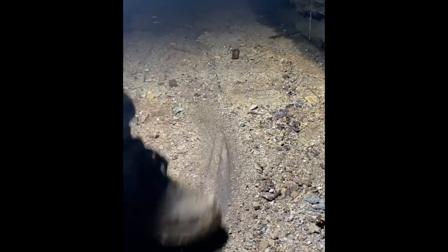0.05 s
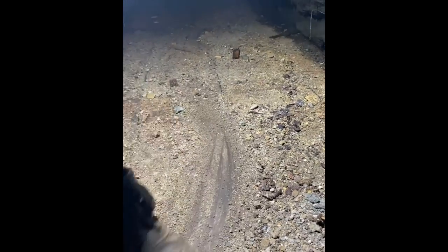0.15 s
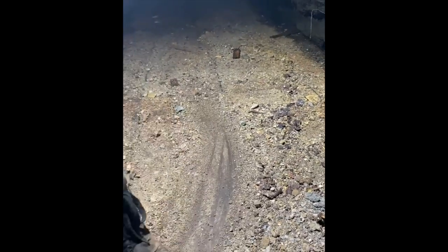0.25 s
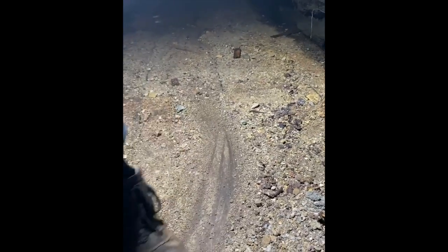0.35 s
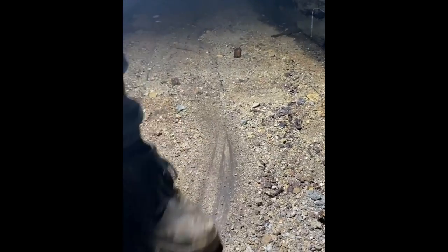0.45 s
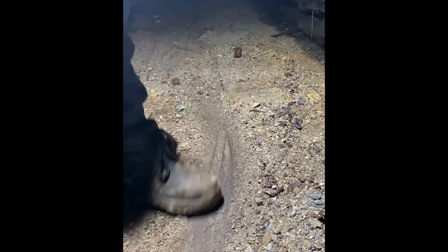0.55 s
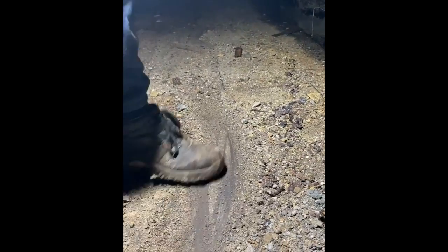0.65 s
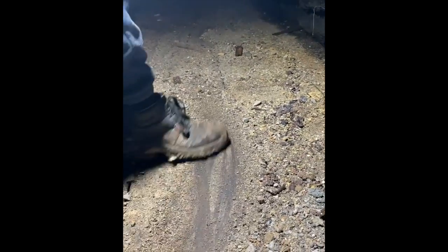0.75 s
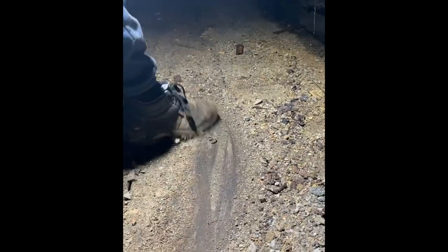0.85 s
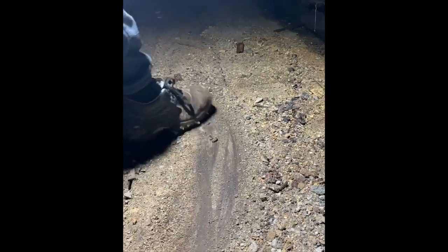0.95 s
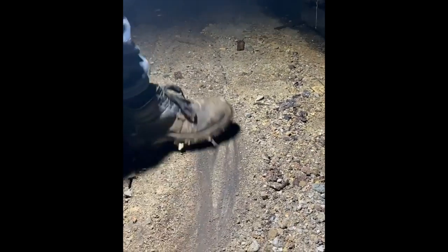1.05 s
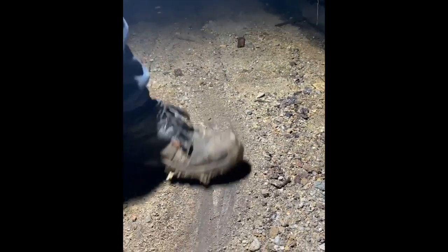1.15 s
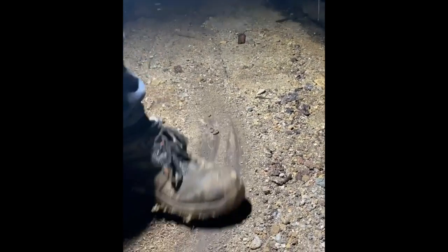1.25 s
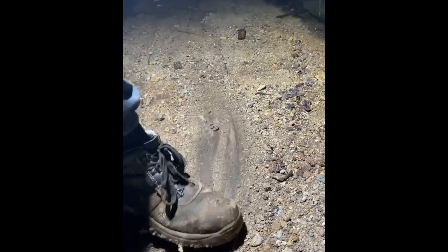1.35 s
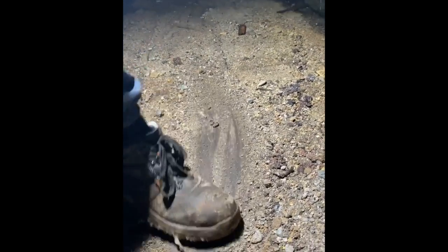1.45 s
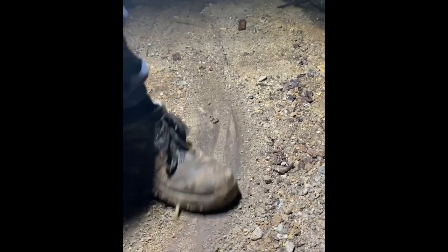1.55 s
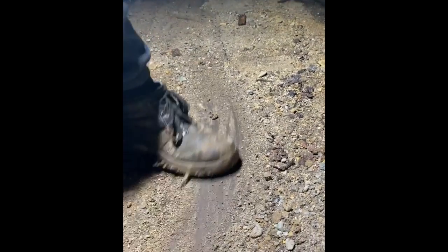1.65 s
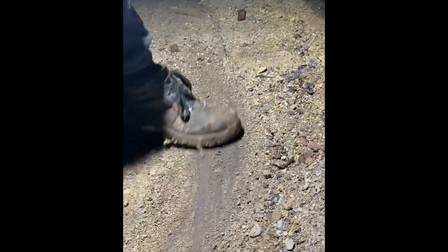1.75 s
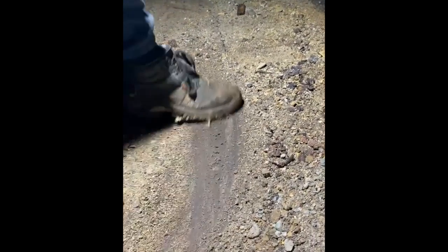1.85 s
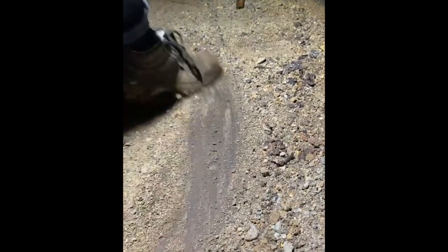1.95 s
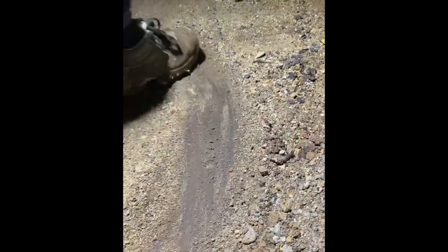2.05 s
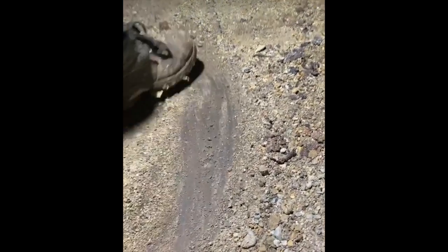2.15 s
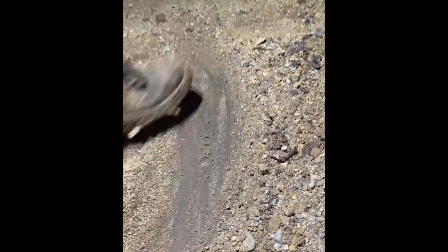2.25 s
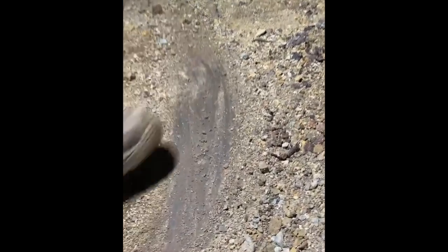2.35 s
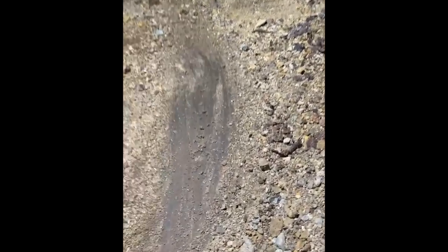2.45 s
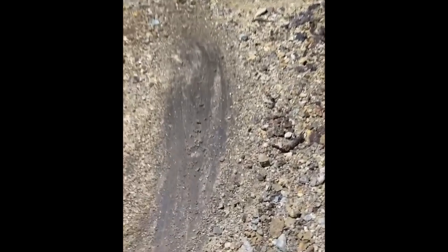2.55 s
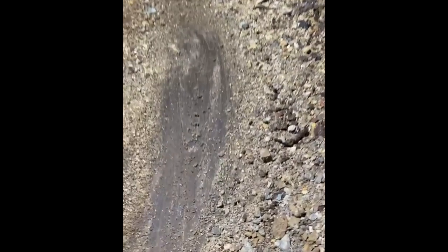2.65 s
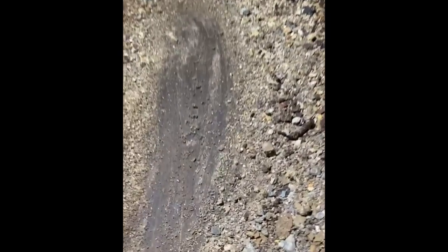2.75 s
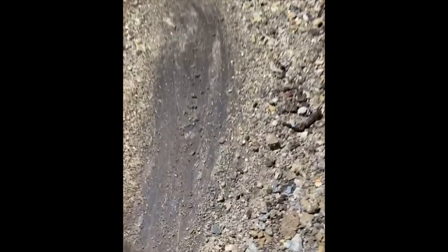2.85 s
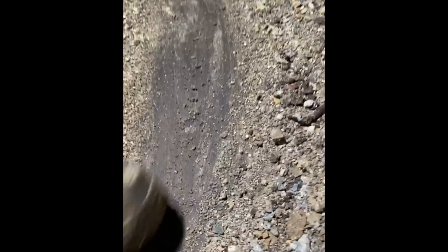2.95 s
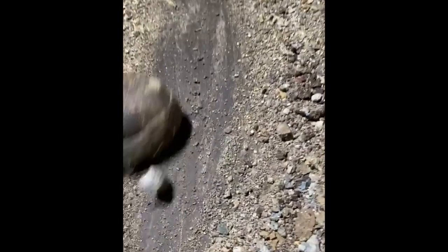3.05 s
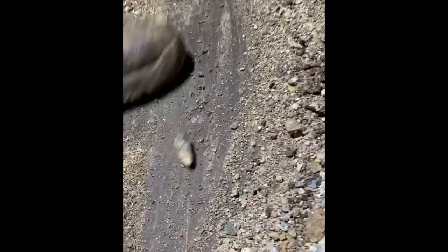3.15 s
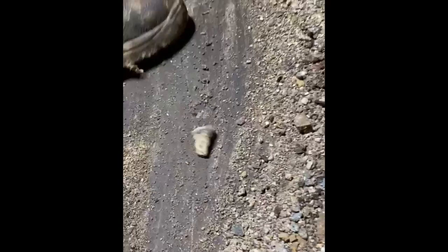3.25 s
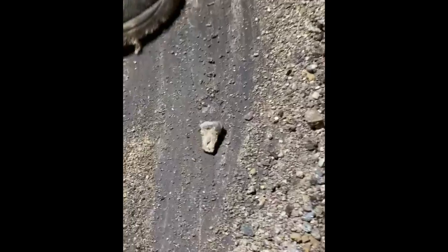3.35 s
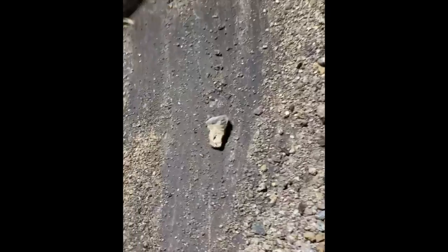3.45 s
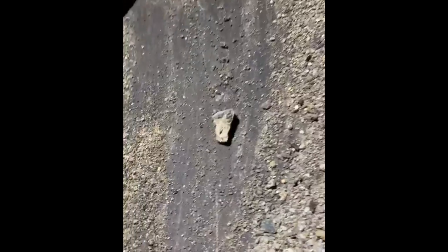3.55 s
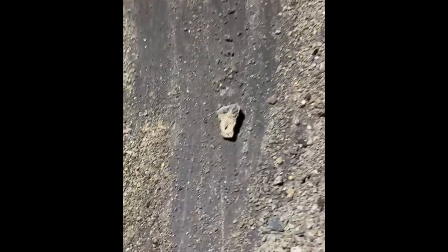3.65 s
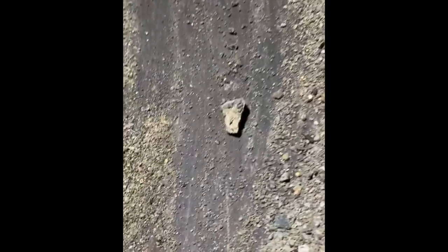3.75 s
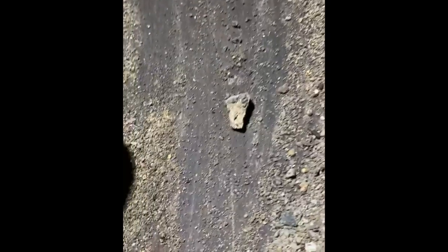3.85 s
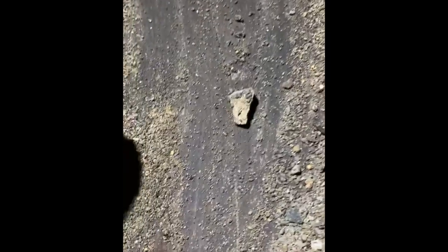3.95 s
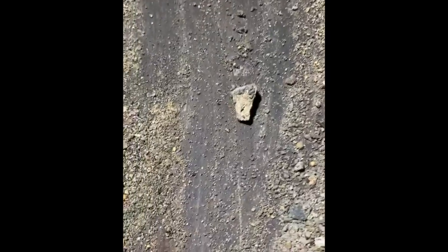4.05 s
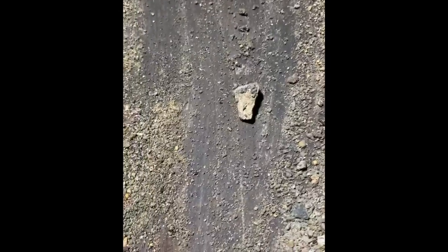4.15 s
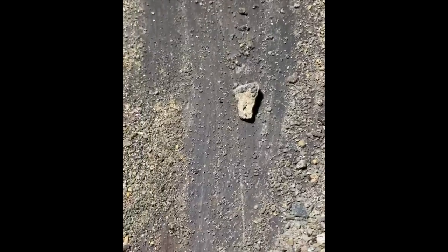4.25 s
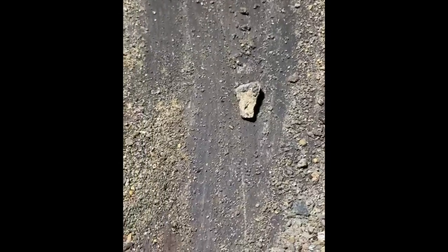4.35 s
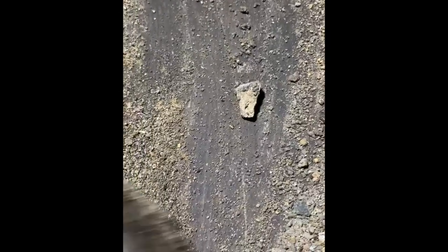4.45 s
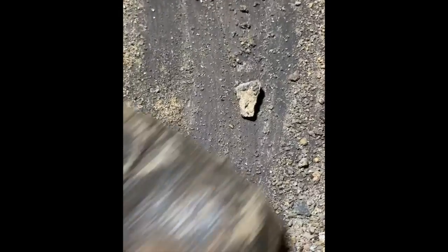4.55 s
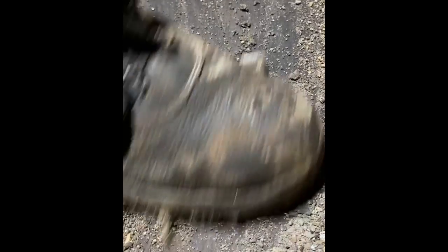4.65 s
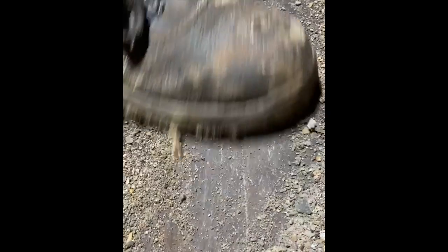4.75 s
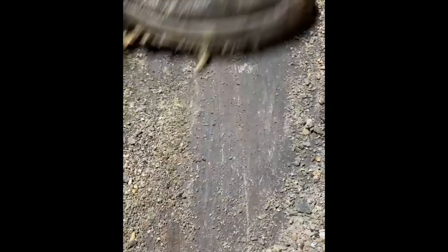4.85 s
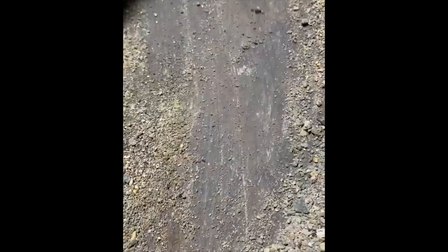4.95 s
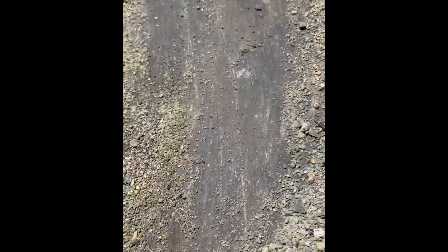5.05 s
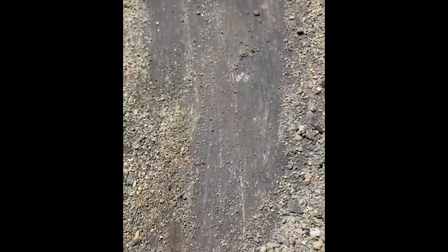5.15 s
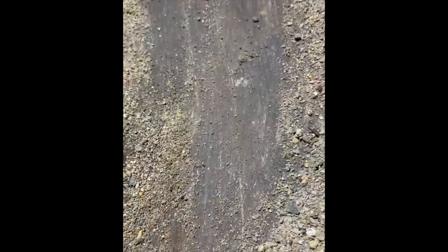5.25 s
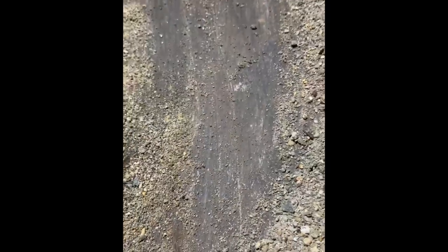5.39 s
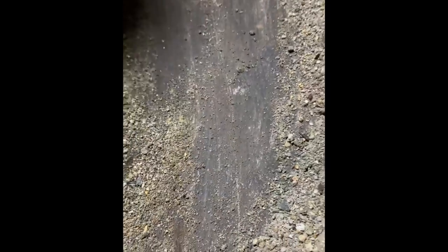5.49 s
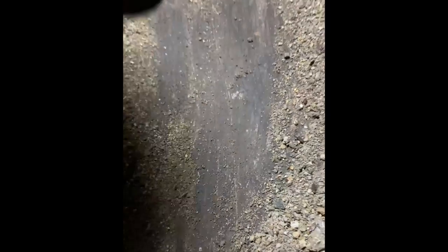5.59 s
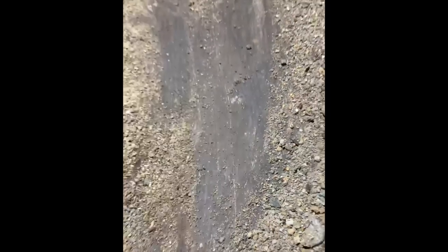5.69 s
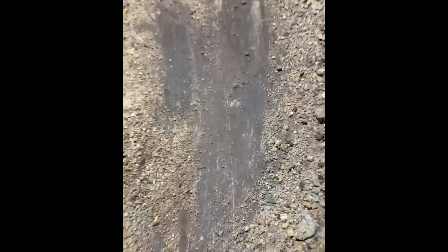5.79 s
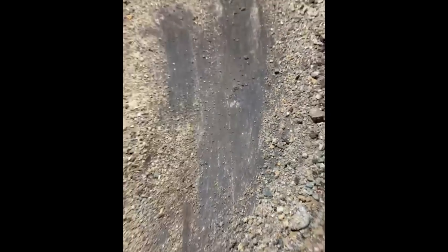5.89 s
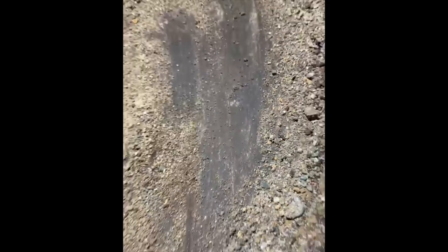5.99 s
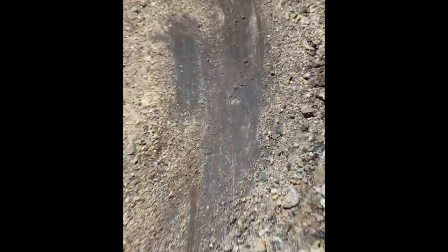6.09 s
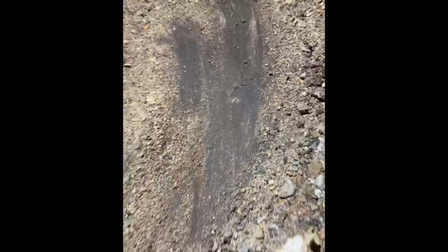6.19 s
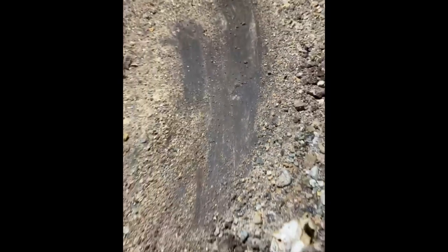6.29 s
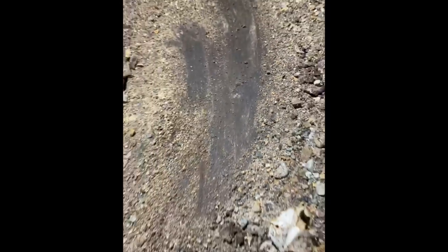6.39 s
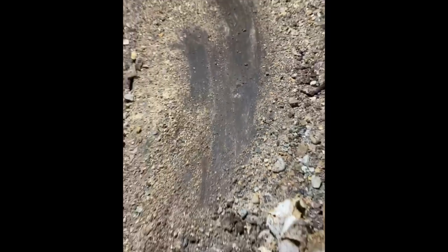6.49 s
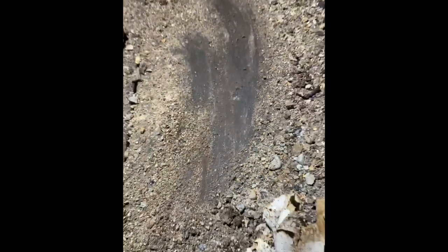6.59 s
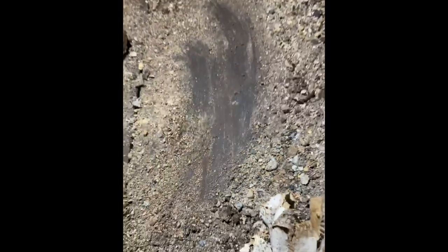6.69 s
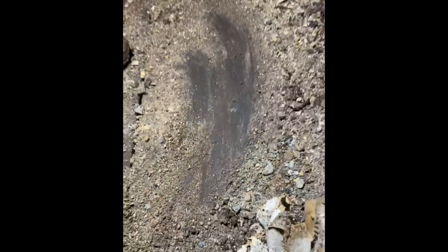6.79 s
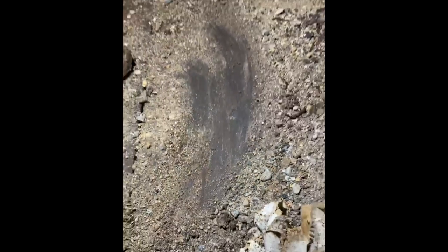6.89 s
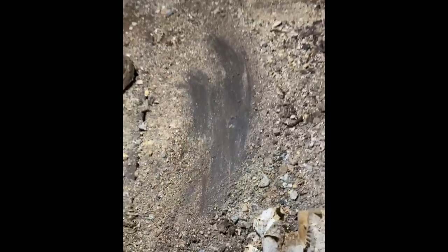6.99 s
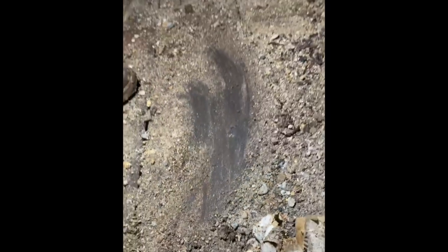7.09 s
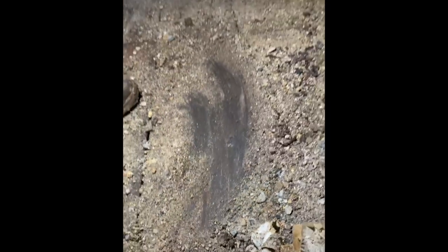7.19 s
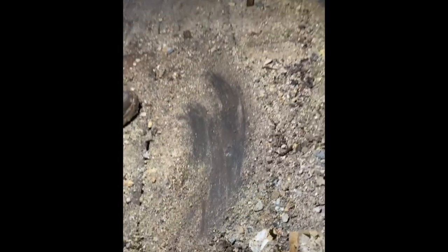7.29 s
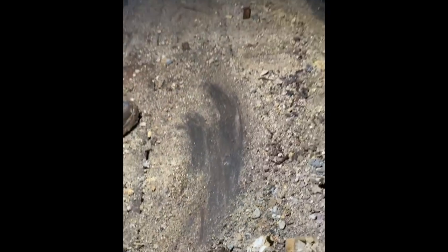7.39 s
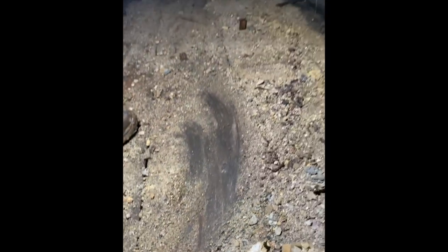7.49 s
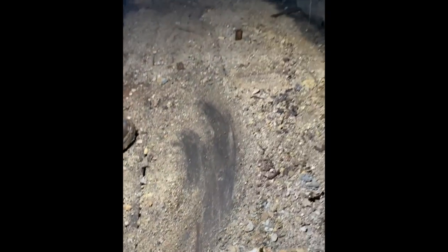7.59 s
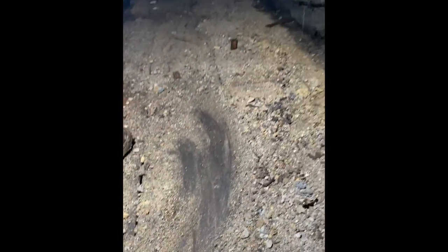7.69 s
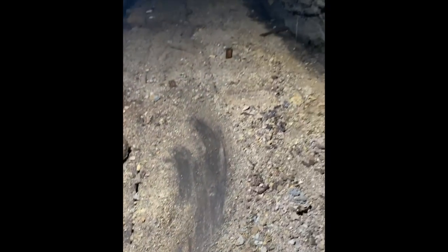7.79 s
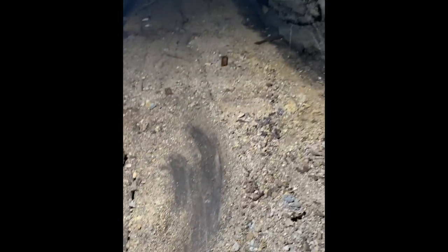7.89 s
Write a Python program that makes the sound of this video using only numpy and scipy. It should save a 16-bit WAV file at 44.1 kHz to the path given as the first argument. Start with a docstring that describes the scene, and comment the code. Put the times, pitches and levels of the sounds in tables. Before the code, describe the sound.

A heavy boot works over gritty packed ground in a still cellar, heard close in stereo with a slight short echo. A loud stone knock sounds at 0.1 s, then a gravelly scrape runs from 0.35 s, strongest around 0.8 s. A second drag from 1.4 s grinds coarser, with deep soft thuds near 1.8 s, and a crunch with a bright tick follows at 2.15 s. From 2.6 s pebbles tick and knock, building to the loudest hard crunch, snap and thump at about 2.97 s; scraping continues until 3.5 s. A lull holds only small stone clicks around 4.2 s. At 4.5 s the sole faintly ratchets, then knocks, judders and drags to about 5.3 s. A short scuff and knock come at 5.8 s. From 6.1 s to nearly 8 s, only faint grit shifts and tiny knocks remain over quiet low air.

```python
"""A work boot drags across a gritty cellar floor: clumped grain noise, its layers following pressure,
slide and weight. Stones knock and tick, and the other foot shifts its weight; knocks glide down,
as the ground carries treble faster than bass. Packed ground thuds as decaying sines; the loaded sole
slips and judders, ringing its modes. Cellar echo and still air surround it, at two microphone ports."""
import sys
import numpy as np
from scipy import signal
from scipy.fft import rfft, irfft, next_fast_len
from scipy.io import wavfile
from scipy.ndimage import uniform_filter1d

SR = 44100
rng = np.random.default_rng(int(sys.argv[2]) if len(sys.argv) > 2 else 0)


def digitize_waveform(pressure):
    """Quantize a signal to 16-bit integers and store it at the path in sys.argv[1].

    Rows of a 2-D input are taken as channels; values are limited to [-1, 1].
    """
    field = np.atleast_2d(pressure).T
    bounded = np.clip(field, -1, 1)
    quanta = np.round(bounded * 32767).astype(np.int16)
    wavfile.write(sys.argv[1], SR, quanta)


N = 349713

# Event levels are set ahead of the ports; spectrum levels are relative.
# still cellar air: freq_hz, level_db
AIR_SPECTRUM = [(18, -30), (30, 5), (76, 13.5), (597, -10), (1780, -19.5), (4780, -49), (6530, -42.5),
                (10400, -38.5), (15000, -71)]
# strokes and weight shifts, one sub-table each: time_s, pressure_db (gravel), slide_db (grit), weight_db (rumble)
STROKES = [
    [(0.0, -55.5, -74, -38), (0.05, -64, -60, -56.5), (0.13, -34, -54, -37.5), (0.19, -49, -68.5, -54.5),
     (0.33, -43, -51.5, -42)],
    [(0.34, -40.5, -53, -34.5), (0.516, -41, -42.5, -40.5), (0.66, -35.5, -42, -33),
     (0.766, -43, -44.5, -36), (0.772, -20.5, -31.5, -30), (0.817, -26.5, -37, -28.5),
     (0.868, -31.5, -46, -24), (0.9, -45.5, -56, -40), (1.137, -66.5, -86, -52)],
    [(1.375, -66, -75.5, -57.5), (1.47, -52, -47, -47), (1.6, -38.5, -38.5, -42),
     (1.69, -30.5, -38.5, -27.5), (1.744, -39.5, -38.5, -31), (1.824, -24.5, -37, -14.5),
     (1.88, -33, -39, -26), (1.945, -41.5, -52, -31), (1.98, -50.5, -59, -40.5), (2.1, -60.5, -73, -44.5)],
    [(2.15, -46, -57, -36), (2.19, -52, -59, -38), (2.27, -61, -67.5, -51.5), (2.48, -71, -76.5, -54.5),
     (2.58, -80, -65.5, -63.5)],
    [(2.624, -38, -52.5, -36.5), (2.65, -40.5, -58, -25.5), (2.73, -46.5, -55.5, -40), (2.8, -38, -48, -27),
     (2.87, -29.5, -63, -26.5), (2.945, -36.5, -60.5, -27.5)],
    [(2.99, -32, -42.5, -19.5), (3.041, -37, -43, -23), (3.11, -36, -32, -37), (3.16, -34.5, -40, -26.5),
     (3.23, -45, -41.5, -42.5), (3.43, -39, -43.5, -33.5), (3.49, -50, -57, -45), (3.8, -68.5, -67, -70)],
    [(4.12, -57, -72, -65), (4.15, -48, -64, -46.5), (4.284, -46.5, -62.5, -43), (4.34, -51.5, -65, -45),
     (4.45, -92, -70, -63.5)],
    [(4.49, -75, -60, -87), (4.62, -64, -61.5, -76), (4.635, -41.5, -38, -50.5), (4.69, -41, -36.5, -31.5),
     (4.753, -28, -33.5, -26.5), (4.9, -30.5, -34, -36), (5.123, -31.5, -39.5, -34), (5.2, -40.5, -51, -33),
     (5.43, -64, -73, -63.5)],
    [(5.75, -56.5, -66.5, -58.5), (5.77, -37, -46, -51.5), (5.87, -40.5, -48.5, -46.5),
     (5.92, -49, -58.5, -51.5), (6.0, -60.5, -62, -72)],
    [(6.4, -68, -109, -72.5), (6.68, -62.5, -72.5, -65), (6.86, -51, -70, -56.5), (7.0, -58.5, -71, -50),
     (7.16, -56.5, -69, -59), (7.31, -58, -72, -52.5), (7.42, -69, -75, -71)],
]
# one value per stroke: dust_db re grit
DUST_RE_GRIT_DB = [-7, 0.5, -0.5, -2.5, -6.5, -3.5, 4, 0, -3, -30.5]
# one value per stroke: sand_db re grit
SAND_RE_GRIT_DB = [-6.5, 0, -8, -3.5, 4, -3.5, 4, -9.5, -6, 7]
# loose bits never quite at rest: gravel_db, grit_db, dust_db, rumble_db, sand_db
TRICKLE_DB = (-77, -75.5, -76, -77.5, -80)
# clods crushed under the sole: start_s, gravel_db, grit_db, dust_db, t60_s
CRUNCHES = [(0.344, -41, -37, -42.5, 0.15), (0.63, -36, -49, -31, 0.12), (2.143, -34, -44.5, -38, 0.13),
            (2.959, -9, -21.5, -42.5, 0.082), (2.998, -23, -21, -35, 0.19), (5.858, -36, -31, -45, 0.08),
            (6.061, -53.5, -58.5, -60, 0.45), (6.689, -47.5, -53.5, -60, 0.087),
            (6.984, -42, -80, -89, 0.15)]
# gravel: freq_hz, level_db
GRAVEL_SPECTRUM = [(90, -13.5), (180, 0), (290, 2), (450, -5.5), (750, -5.5), (1200, -12), (1800, -20.5),
                   (3000, -39)]
# grit: freq_hz, level_db
GRIT_SPECTRUM = [(800, -4), (1500, -2.5), (2500, -4), (3500, -4.5), (4600, -5.5), (6000, -37.5)]
# fine dust: freq_hz, level_db
DUST_SPECTRUM = [(3800, -6.5), (5200, -3), (7000, -6.5), (10000, -7.5), (12500, -10.5), (14500, -26),
                 (16500, -26)]
# ground rumble: freq_hz, level_db
GROUND_SPECTRUM = [(20, -47), (45, -25), (62, -2), (72, -0.5), (78, 4.5), (85, -4), (105, -6), (140, -10),
                   (220, -18.5), (400, -53)]
# coarse rolling sand: freq_hz, level_db
SAND_SPECTRUM = [(600, -16), (1100, 5), (1700, 2.5), (2300, 0), (3200, -28)]
# single bright grains snapping: time_s, peak_db, centre_hz
TICKS = [(0.042, -39, 7150), (0.307, -36, 7950), (0.371, -50, 3700), (0.948, -34, 5140),
         (0.9878, -33, 5870), (1.375, -43.5, 5580), (0.822, -16.5, 7000), (1.6747, -20.5, 2780),
         (1.697, -21, 4500), (1.7499, -35, 8330), (2.158, -19, 5500), (2.624, -32, 9200),
         (2.639, -25.5, 9500), (2.656, -39.5, 8900), (2.687, -38.5, 8300), (2.7056, -28.5, 9200),
         (2.835, -33.5, 7160), (2.882, -28, 9600), (2.9016, -27, 9720), (2.9634, -4.5, 8710),
         (2.971, -9.5, 3580), (3.0061, -16.5, 6000), (3.108, -30.5, 7820), (3.744, -46, 2600),
         (4.151, -31.5, 8930), (4.1816, -39.5, 8100), (4.2555, -41.5, 8000), (4.3235, -36, 8000),
         (4.676, -12.5, 3800), (5.4006, -42, 7800), (5.863, -29.5, 3980), (5.94, -39, 6400),
         (5.982, -40.5, 5000), (6.004, -42, 4500), (6.014, -47, 5000), (6.051, -44, 7040),
         (6.08, -43, 6000), (6.11, -49, 2460), (6.488, -50, 3500)]
# stone knocks: time_s, peak_db, centre_hz, crumbs_db (re blow)
KNOCKS = [(0.074, -32, 1190, -11), (0.093, -2.5, 930, -24), (0.1143, -5, 1030, -27.5),
          (0.343, -23.5, 780, -3), (0.634, -22, 895, -11), (0.770, -14.5, 900, -24),
          (1.676, -15.5, 800, -37), (1.815, -19, 1040, -5.5), (1.828, -18, 1530, -9),
          (1.877, -24.5, 810, -22), (2.149, -25, 600, -11), (2.188, -33, 1970, -29),
          (2.277, -47, 3480, -17), (2.626, -43.5, 692, -21), (2.71, -25.5, 900, -17),
          (2.783, -23.5, 880, -20), (2.819, -22, 746, -3), (2.911, -21.5, 735, -28),
          (2.949, -16.5, 860, -6), (2.959, -5, 768, -12), (2.969, -8.5, 910, -22), (3.003, -17.5, 804, -12),
          (3.018, -17.5, 1492, -21), (3.146, -12.5, 903, -24), (3.646, -38, 1820, -29),
          (4.04, -45, 2020, -17), (4.12, -45, 1250, -18.5), (4.147, -48, 1220, -16), (4.177, -36, 674, -14),
          (4.2, -34.5, 1250, -28), (4.225, -42, 1250, -14), (4.258, -38, 1300, -15),
          (4.286, -33.5, 1140, -13), (4.339, -36, 1320, -34), (4.677, -13, 1270, -45),
          (4.726, -24.5, 800, -8), (5.04, -13.5, 960, -21), (5.257, -36.5, 735, -11),
          (5.363, -39.5, 730, -23.5), (5.836, -15, 944, -25), (5.864, -22, 827, -22),
          (5.969, -41, 1480, -24), (6.067, -37, 700, -20), (6.137, -38, 566, -30.5), (6.488, -41, 235, -39),
          (6.535, -48.5, 1910, -22), (6.614, -40.5, 3100, -22), (6.8643, -47, 1294, -15.5),
          (6.878, -36, 1400, -28), (6.886, -34, 700, -15), (6.918, -45.5, 1510, -15),
          (6.99, -36.5, 700, -16), (7.075, -39, 900, -19), (7.192, -44, 936, -15),
          (7.247, -38.5, 1210, -22.5), (7.301, -42, 1470, -25), (7.514, -47.5, 1636, -21),
          (7.641, -45.5, 1258, -20), (7.822, -45.5, 218, -30.5)]
# decay of the cellar echo: freq_hz, t60_s
CELLAR_DECAY = [(100, 0.49), (500, 0.7), (2000, 0.74), (8000, 0.071)]
# sole lands or catches: start_s, peak_db (before swell and decay), ground_hz, t60_s
THUDS = [(0.349, -25, 80.4, 0.36), (0.382, -21, 78.8, 0.21), (0.771, -20.5, 130.6, 0.36),
         (0.819, -23, 94.5, 0.079), (1.386, -28.5, 72.4, 0.23), (1.739, -12.5, 84, 0.077),
         (1.778, -2.5, 77.4, 0.14), (1.815, -9.5, 78, 0.26), (1.835, -4.5, 77.4, 0.21),
         (2.632, -21, 77, 0.16), (2.9784, 4, 78, 0.071), (3.388, -17.5, 129, 0.099),
         (4.687, -21, 82.4, 0.31), (4.781, -27, 79.5, 0.27), (4.84, -19.5, 77.3, 0.34),
         (5.153, -23.5, 110.7, 0.18)]
# modes of the sole: mode_hz, level_db (relative), t60_s
SOLE_MODES = [(530, -26, 0.03), (1320, -9, 0.0067), (2600, -4.5, 0.0068), (3830, 0.5, 0.0017),
              (6130, -2.5, 0.0018)]
# loaded sole judders: start_s, peak_db
JUDDERS = [(4.727, -17), (4.745, -16.5), (4.759, -27), (4.782, -19.5), (4.795, -14.5), (4.803, -16.5),
           (4.823, -19.5)]
# phase between the ports: freq_hz, left_lead_rad
PORT_LEAD = [(150, 0), (1300, -.6), (2000, .2), (3300, 1), (4500, 2), (4910, 3.4), (5250, 6.2), (5900, 7.1),
             (12700, 9.3), (16100, 9.4)]
# level between the ports: freq_hz, left_minus_right_db
PORT_LEAN = [(60, -2), (150, -0.05), (380, 3.5), (950, 4.5), (2380, -2), (5980, -0.5), (15000, 1.5)]
# likeness of the ports: freq_hz, correlation (0-1)
PORT_LIKENESS = [(100, 1.0), (400, 0.94), (1000, 0.42), (3000, 0.14), (6000, 0.88), (12000, 0.8),
                 (15000, 1)]

AIR_DB = -67
LAND_DB_PER_S, SETTLE_DB_PER_S = 3000., 110.
DUST_STEEPER, BRISK_DB = 0.025, -42  # extra dust dB per slide dB above BRISK_DB
CRUNCH_RISE_S = 0.0034
SKIPS_PER_S, SKIPS_DB, SKIP_SPREAD_DB = 33, -9, 0.5
SWELL_S, FACETS_DB = .001, 3.  # room for a stone's short swell; rms unevenness of its ring
CRUMBS_T60_S = .042
TICK_CRUMBS_DB, TICK_T60_S = -13., .016
ECHO_DB = -31.0
RATCHET_S, SLIP_GAP_S, SLIP_DRAG_S, SLIP_SLOWING = 4.4982, .0105, .0005, 2.05
SLIP_DB, FIRST_SLIP_DB, SLIP_BITE = -28.5, -16.5, 0.6  # final peak, first re final, shrink per slip
CEILING, EDGE_HZ = 1.5, 16300


def gain_of(db):
    """Amplitude factor of a level in dB."""
    return 10 ** (np.asarray(db) / 20)


def evened(x):
    """Scales x to unit rms."""
    return x / np.sqrt(np.mean(x ** 2) + 1e-20)


def read(points, hz):
    """Interpolates a table over log frequency."""
    f, value = np.transpose(points)
    return np.interp(np.log(hz + 1), np.log(f + 1), value)


def add(mix, start_s, sound):
    """Adds a sound in place, cut at the end of the mix."""
    part = mix[..., round(start_s * SR):][..., :sound.shape[-1]]
    part += sound[..., :part.shape[-1]]


def coloured(x, points):
    """Filters x by a spectrum table."""
    size = next_fast_len(x.shape[-1])
    gain = gain_of(read(points, np.fft.rfftfreq(size, 1 / SR)))
    return irfft(rfft(x, size) * gain, size)[..., :x.shape[-1]]


def wander(hz):
    """Slow chance up to about hz, unit rms."""
    lowpass = signal.butter(2, hz, fs=SR, output="sos")
    return evened(signal.sosfilt(lowpass, rng.standard_normal(N)))


def still_air():
    """Faint steady noise with the colour of the cellar air."""
    return gain_of(AIR_DB) * evened(coloured(rng.standard_normal((2, N)), AIR_SPECTRUM))


def effort():
    """Layer gains, powers summed: strokes land at once and settle slowly, crunches die away."""
    t = np.arange(N) / SR
    power = gain_of(TRICKLE_DB)[:, None] ** 2 * np.ones(N)
    for stroke, dust_db, sand_db in zip(STROKES, DUST_RE_GRIT_DB, SAND_RE_GRIT_DB):
        s, *controls = np.transpose(stroke)
        landing_db = -LAND_DB_PER_S * np.maximum(s[0] - t, 0)
        settling_db = -SETTLE_DB_PER_S * np.maximum(t - s[-1], 0)
        pressure, slide, weight = (np.interp(t, s, c) + landing_db + settling_db for c in controls)
        dust = slide + dust_db + DUST_STEEPER * (slide - BRISK_DB)
        power += gain_of([pressure, slide, dust, weight, slide + sand_db]) ** 2
    after = t[:SR // 2]
    rise = np.minimum(after / CRUNCH_RISE_S, 1)
    for start_s, *layers_db, t60_s in CRUNCHES:
        crunch = gain_of(np.c_[layers_db] - 60 * after / t60_s) * rise
        add(power[:3], start_s, crunch ** 2)  # gravel, grit, dust
    return np.sqrt(power)


def grains(per_s, spread_db, clumps, colour):
    """Two unrelated trains of uneven breaking grains over fine dust, coming in clumps."""
    size = gain_of(spread_db * np.minimum(rng.exponential(1, (2, N)), 5))
    size = size * rng.choice([-1, 1], (2, N))
    breaks = evened(size * (rng.random((2, N)) < per_s / SR))
    train = breaks + .7 * rng.standard_normal((2, N))
    return evened(coloured(train, colour) * clumps)


def patchy(x, patchy_db):
    """Colour drifts in patches a few hundred hertz wide as different grains pass under the sole."""
    z = signal.stft(x, nperseg=512)[2]
    patches = uniform_filter1d(rng.standard_normal(z.shape[1:]), size=3, axis=0)
    patches = evened(uniform_filter1d(patches, size=8, axis=1))
    return evened(signal.istft(z * gain_of(patchy_db * patches), nperseg=512)[1][:, :N])


def knock(peak_db, hz, crumbs_db, t60_s, size):
    """A blow and its crumbs ring a broad band; lower parts arrive later."""
    t, f = np.arange(size) / SR, np.fft.rfftfreq(size, 1 / SR) + 20
    crumbs = rng.standard_normal(size)
    blow = gain_of(crumbs_db - 60 * t / t60_s) * (1 - np.exp(-t / 0.002)) * crumbs
    blow[0] = 1
    late = np.exp(-2j * np.pi * 1.55 * np.log(f / f[-1]))  # 1.55 cycles late at every pitch
    band = np.exp(-(np.log2(f / hz) / 0.71) ** 2)
    skirt = 0.16 / (1 + (f / max(3800., hz)) ** 6) / (1 + (hz / 34.0 / f) ** 2) + 0.004
    skirt = skirt * min(hz / 1100.0, 1) ** 2  # dull blows carry little edge
    ripple = evened(uniform_filter1d(uniform_filter1d(crumbs, size=20), size=20))[:len(f)]
    uneven = irfft(FACETS_DB * np.log(10) / 20 * ripple)
    # minimum phase: the uneven ring only follows the blow
    facets = np.exp(rfft(2 * uneven * (t < t[-1] / 2)) - uneven[0] - 2j * np.pi * f * SWELL_S)
    body = irfft(rfft(blow) * late * facets * (band + skirt))
    body = body * np.minimum(2 - 2 * t / t[-1], 1) ** 2  # fade out
    return gain_of(peak_db) * body / abs(body).max()


def skips(level):
    """Loose pebbles skip: sparse small knocks of mixed pitch, following the grit level."""
    chance, size, kind = rng.random(N), rng.exponential(1, N), rng.integers(0, 8, N)
    skip_gain = gain_of(SKIPS_DB + SKIP_SPREAD_DB * np.minimum(size, 3))
    train = level * skip_gain * (chance < SKIPS_PER_S / SR)
    shapes = [knock(0, hz, -13.5, 0.013, 1024) for hz in np.geomspace(900., 4500., num=8)]
    return sum(signal.oaconvolve(train * (kind == k), shape)[:N] for k, shape in enumerate(shapes))


def scrape():
    """The sole slips and sticks: grit and gravel break in partly shared clumps, the ground rumbles along."""
    slips = .7 * wander(hz=29.4) + 1.2 * wander(hz=152.0)
    # clumping in dB: shared slips plus each layer's own wander
    grit = grains(2500., 3.2, gain_of(1.5 * slips + 1.4 * wander(hz=400.)), GRIT_SPECTRUM)
    sand = grains(1500., 4.8, gain_of(1.9 * slips + 0.49 * wander(hz=59.4)), SAND_SPECTRUM)
    dust = grains(4000., 2.8, gain_of(1.3 * slips + 1.4 * wander(hz=400.)), DUST_SPECTRUM)
    gravel = grains(2000., 2.6, gain_of(1.5 * slips + 0.32 * wander(hz=62.8)), GRAVEL_SPECTRUM)
    rumble = grains(300., 2.5, gain_of(1.1 * slips), GROUND_SPECTRUM)
    layers = patchy(gravel, 3.2), patchy(grit, 3.8), patchy(dust, 3.2), rumble, patchy(sand, 0.96)
    gains = effort()
    ground = sum(gain * layer for gain, layer in zip(gains, layers))
    return ground + skips(gains[1]) * np.array([[1], [.3]])


def stones():
    """Bright grains snap and stones knock, each a blow with crumbs."""
    out = np.zeros(N)
    for time_s, peak_db, hz in TICKS:
        add(out, time_s - SWELL_S, knock(peak_db, hz, TICK_CRUMBS_DB, TICK_T60_S, 4096))
    for time_s, peak_db, hz, crumbs_db in KNOCKS:
        add(out, time_s - SWELL_S, knock(peak_db, hz, crumbs_db, CRUMBS_T60_S, 4096))
    return out


def cellar(x):
    """Echo by sparse taps of random sign, each band dying at its own speed."""
    taps = np.zeros((2, SR // 2))
    at = np.arange(200, SR // 2 - 20, 20) + rng.integers(0, 20, (2, 1))
    at = at + rng.integers(0, 10, at.shape) - 10
    np.put_along_axis(taps, at, rng.choice([-1., 1.], at.shape), 1)
    hz, t, z = signal.stft(taps, SR, nperseg=256)
    decay = gain_of(-60 * t / read(CELLAR_DECAY, hz)[:, None])
    tail = signal.istft(z * decay, SR, nperseg=256)[1]
    return signal.fftconvolve(x[None], tail / np.linalg.norm(tail[0]), axes=1)[:, :N]


def thuds():
    """The ground swings a few times, swelling quickly and sinking in pitch from 23 % sharp."""
    out, t = np.zeros(N), np.arange(SR // 2) / SR
    swell = 1 - np.exp(-t / 0.0033)
    for start_s, peak_db, hz, t60_s in THUDS:
        turns = hz * (t + 0.00083 * (1 - np.exp(-t / 0.0036)))
        add(out, start_s, gain_of(peak_db - 60 * t / t60_s) * swell * np.sin(2 * np.pi * turns))
    return out


def sole_slips():
    """The sole ratchets over a ridge, slowing and biting harder, then judders; each slip rings its modes."""
    out, t = np.zeros(N), np.arange(2000) / SR
    k = np.arange(7)
    drag_s = np.cumsum(np.r_[0, SLIP_DRAG_S * SLIP_SLOWING ** k[:-1]])
    starts_s = RATCHET_S + SLIP_GAP_S * k + drag_s
    peaks_db = SLIP_DB + FIRST_SLIP_DB * SLIP_BITE ** k
    for start_s, peak_db in [*zip(starts_s, peaks_db), *JUDDERS]:
        slip = np.zeros(len(t))
        for hz, db, t60_s in SOLE_MODES:
            bent_hz = hz * rng.uniform(.93, 1.07)
            slip += gain_of(db - 60 * t / t60_s) * np.sin(2 * np.pi * bent_hz * t)
        slip *= 1 - np.exp(-t / 0.00079)
        add(out, start_s, gain_of(peak_db) * slip / abs(slip).max())
    return out


def ports(pair):
    """Turns a sound and its twin into left and right: partly alike, leaning and shifted by pitch."""
    hz = np.fft.rfftfreq(N, 1 / SR)
    one, twin = rfft(pair)
    half = np.arccos(np.clip(read(PORT_LIKENESS, hz), 0, 1)) / 2
    tilt = gain_of(read(PORT_LEAN, hz) / 2) * np.exp(.5j * read(PORT_LEAD, hz))
    left = (np.cos(half) * one + np.sin(half) * twin) * tilt
    right = (np.cos(half) * one - np.sin(half) * twin) / tilt
    return irfft([left, right], N)


def scene():
    """Sums air, scrape, hits, echo of the hits and thuds at the two ports."""
    hits = stones() + sole_slips()
    echo = gain_of(ECHO_DB) * cellar(hits)
    direct = (hits + thuds()) * np.array([[1], [0]])  # no twin
    return ports(still_air() + scrape() + echo + direct)


def record(dry):
    """The loudest peaks round off; then the band limit."""
    soft = CEILING * np.tanh(dry / CEILING)
    lowpass = signal.firwin(511, EDGE_HZ, window=("kaiser", 9), fs=SR)
    return signal.oaconvolve(soft, lowpass[None], "same")


dry = scene()
out = record(dry)
digitize_waveform(out)
```